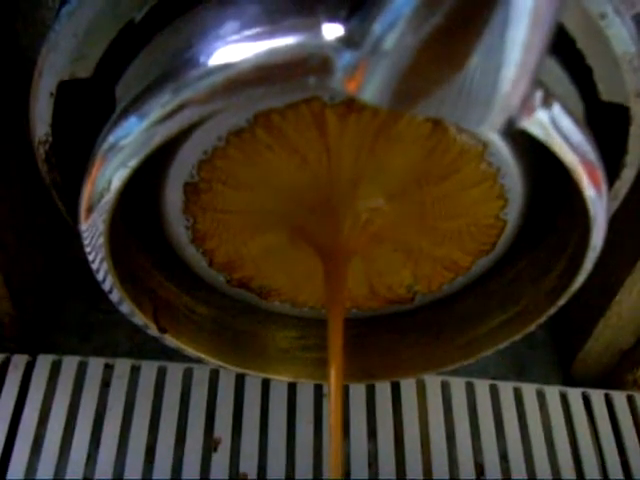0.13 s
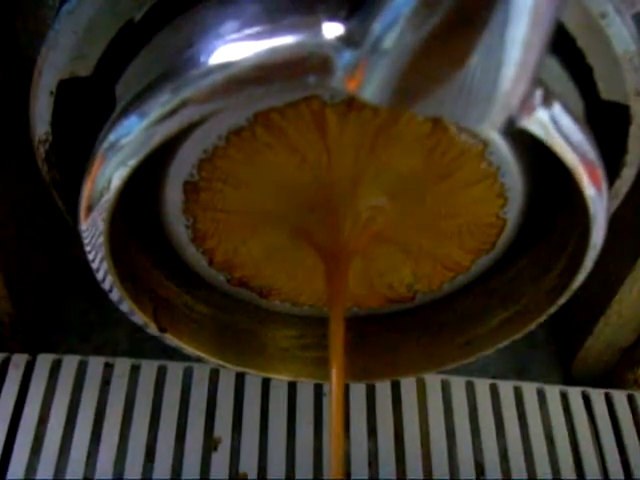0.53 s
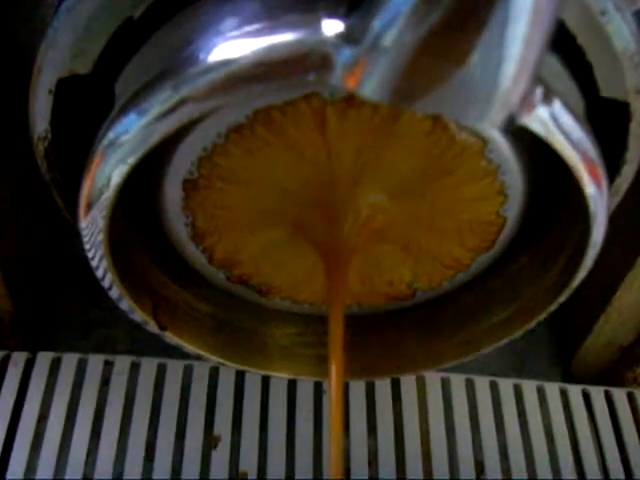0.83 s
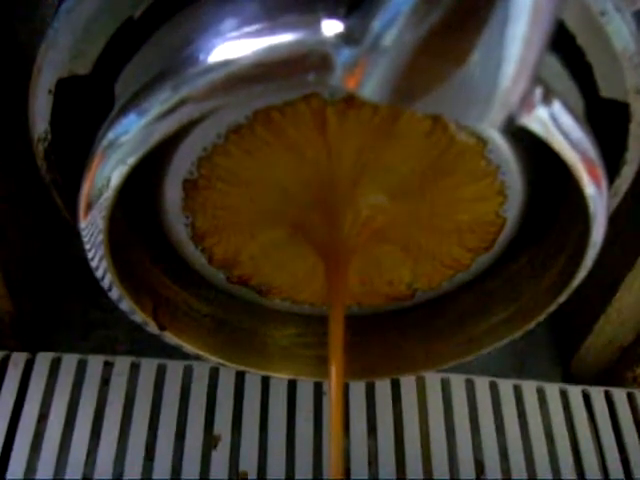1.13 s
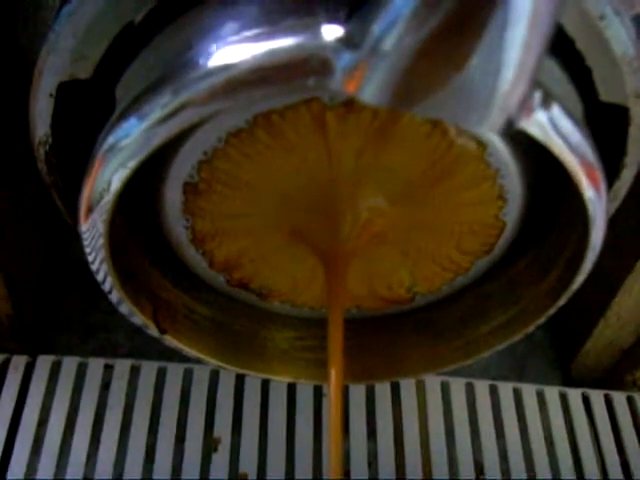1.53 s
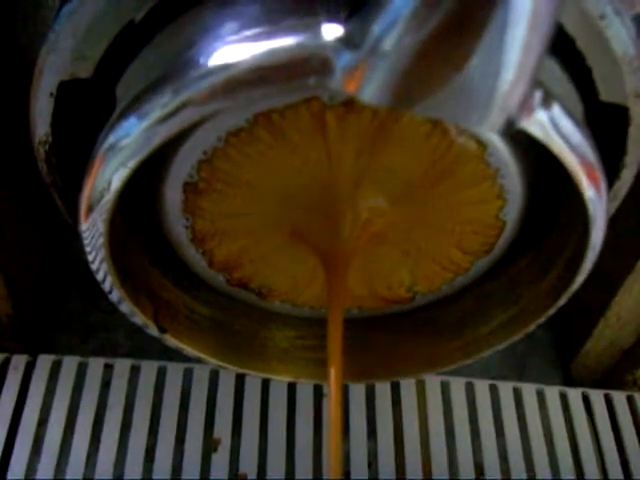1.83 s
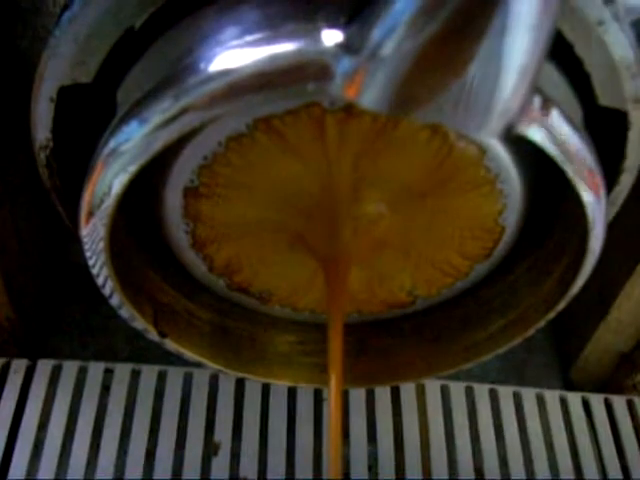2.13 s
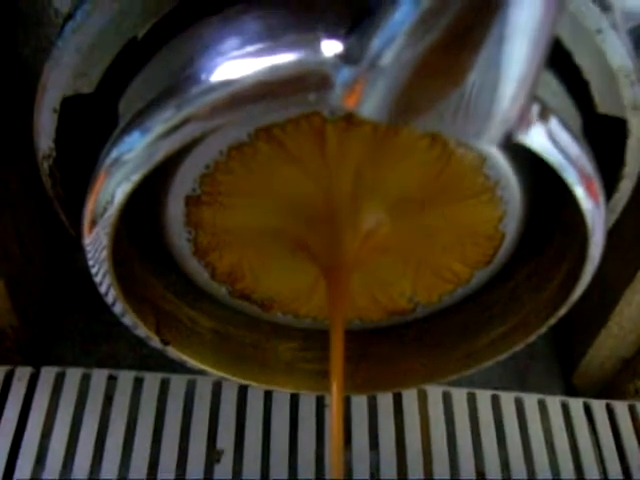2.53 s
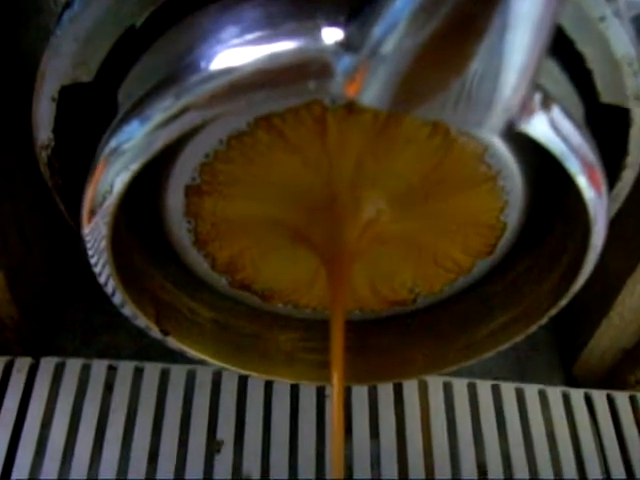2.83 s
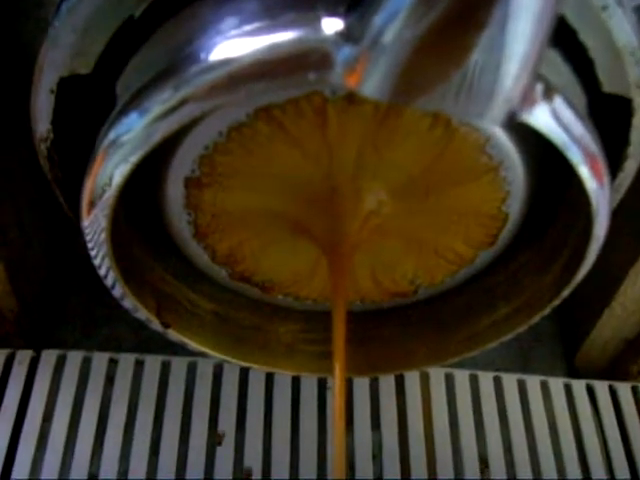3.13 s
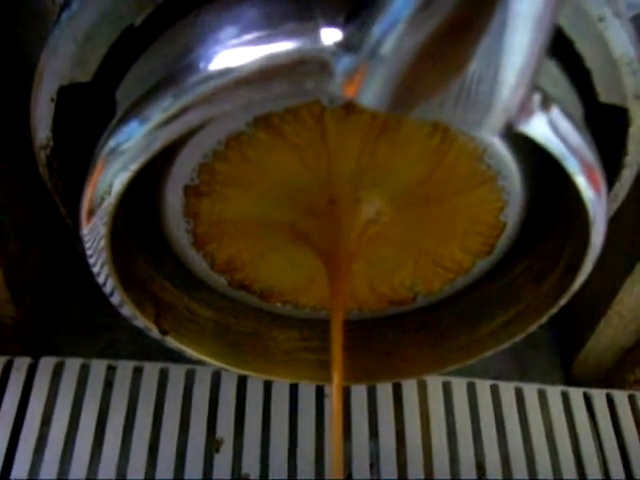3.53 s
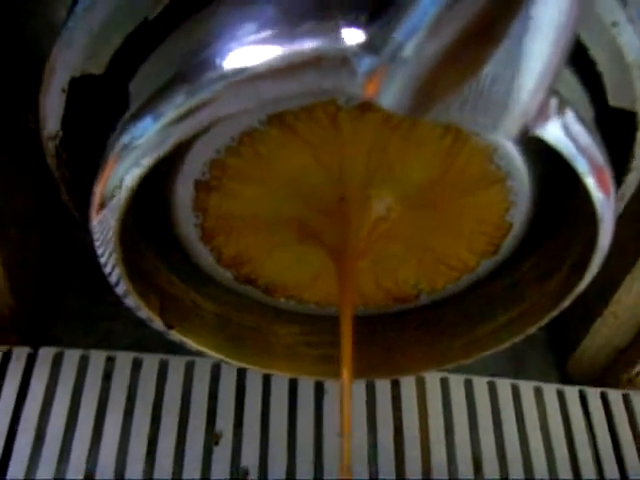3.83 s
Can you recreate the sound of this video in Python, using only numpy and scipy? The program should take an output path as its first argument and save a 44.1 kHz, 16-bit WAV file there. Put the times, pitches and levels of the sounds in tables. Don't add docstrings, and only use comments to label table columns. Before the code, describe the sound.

An espresso machine's harsh hammering buzz cuts off, followed by small clicks, bumps and a last hiss

```python
import sys
import numpy as np
from scipy import signal
from scipy.io import wavfile

SR = 44100
rng = np.random.default_rng(int(sys.argv[2]) if len(sys.argv) > 2 else 0)


def master(y):
    cut = np.clip(np.atleast_2d(y).T, -1, 1)
    pcm = np.round(cut * 32767)
    wavfile.write(sys.argv[1], SR, pcm.astype(np.int16))


def amplitude_ratio(level_db):
    exponent = np.asarray(level_db, float) / 20
    return 10 ** exponent


N = 176400
T = np.arange(N) / SR
STROKE_HZ, FIRST_S, STOP_S = 50.035, .0032, 1.7215
JITTER_S, SCATTER_DB = .0001, .8
THROB = .38
ROOM_T60 = 0.18


def evened(x):
    return x / np.sqrt(np.mean(x ** 2) + 1e-20)


def read(points, hz):
    f, value = np.transpose(points)
    return np.interp(np.log(hz + 1), np.log(f + 1), value)


def colour(x, points, peaks=()):
    hz = np.abs(np.fft.fftfreq(8192, 1 / SR))
    db = read(points, hz)
    db = db + sum(gain / (1 + (2 * (hz - f) / width) ** 2) for f, width, gain in peaks)
    minimum_phase = np.exp(np.conj(signal.hilbert(np.log(amplitude_ratio(db)))))
    taps = np.fft.ifft(minimum_phase).real[:4096]
    return signal.oaconvolve(x, taps)[:N]


def ring(modes, rise=0.0003):
    t = T[:3000]
    tones = sum(amplitude_ratio(db - 60 * t / t60) * np.sin(2 * np.pi * hz * t) for hz, db, t60 in modes)
    return np.minimum(t / rise, 1) * tones


def train(times, sizes):
    out = np.zeros(N)
    places = np.round(np.asarray(times) * SR).astype(int)
    np.add.at(out, np.clip(places, 0, N - 1), sizes)
    return out


def struck(times, sizes, modes, rise=0.0003):
    return signal.oaconvolve(train(times, sizes), ring(modes, rise))[:N]


def fuzzy(hz, width):
    r = np.exp(-np.pi * width / SR)
    noise = rng.standard_normal(N) + 1j * rng.standard_normal(N)
    slow = signal.lfilter([1], [1, -2 * r, r * r], noise)
    return evened((slow * np.exp(2j * np.pi * hz * T)).real)


def after(s, t60):
    return (T >= s) * amplitude_ratio(-60 * np.maximum(T - s, 0) / t60)


def throb():
    return np.cos(2 * np.pi * STROKE_HZ * (T - FIRST_S - .0078))


def rattle(at, luck):
    # (delay [s], level [dB], time to die by 60 dB [s])
    blows = [
        (0, 2.5, 0.023),
        (.0045, -3.5, 0.0052),
        (.0112, -12, 0.01),
    ]
    # (frequency [Hz], level [dB per Hz])
    case = [(150, -61), (1500, -35), (2100, -10.5), (3000, -13), (6000, -13.5), (8470, -11), (11000, -16.5),
            (12500, -21.5)]
    # (frequency [Hz], width [Hz], gain [dB])
    panels = [(2742, 72, 6), (3570, 220, 1), (6200, 590, 6), (7160, 1300, 1.5), (8290, 820, 8),
              (9380, 230, 5.5), ]
    t = T[:2000]
    gate = amplitude_ratio(-12.5) * (T < STOP_S)
    for k, (s, db, t60) in enumerate(blows):
        hits = train(at + s + JITTER_S * luck[:, k], amplitude_ratio(db + SCATTER_DB * luck[:, k + 3]))
        burst = amplitude_ratio(-60 * t / t60) * np.minimum(t / 0.00044, 1)
        gate = gate + signal.oaconvolve(hits, burst)[:N]
    return amplitude_ratio(-27) * evened(colour(gate * rng.standard_normal(N), case, panels))


def crack(at, luck):
    # (frequency [Hz], level [dB], time to die by 60 dB [s])
    crack_tones = [(8640, -0.5, 0.0079), (7100, -2, 0.01), (9650, -14, 0.0071)]
    out = np.zeros(N)
    for k, mode in enumerate(crack_tones):
        times = at + JITTER_S * (1 + luck[:, 0] + .5 * luck[:, 7 + k])
        out += struck(times, amplitude_ratio(SCATTER_DB * luck[:, 9 + k]), [mode])
    return_times = at + .011 + 4 * JITTER_S * luck[:, 2]
    out += struck(return_times, amplitude_ratio(2.0 * luck[:, 5]), [(8550, -10, .014)], rise=.001)
    return amplitude_ratio(-31) * evened(out)


def knock(at, luck):
    # (frequency [Hz], level [dB], time to die by 60 dB [s])
    knock_tones = [(3124, -3, 0.015), (3590, -1.5, 0.022), (3880, -18, 0.0027), (2730, -5.5, 0.034)]
    return amplitude_ratio(-41.5) * evened(struck(at, amplitude_ratio(luck[:, 6]), knock_tones))


def roar():
    # (frequency [Hz], level [dB per Hz])
    body = [(60, -31), (170, -20.5), (300, -12.5), (800, -3), (1500, -4.5), (2200, -8), (3000, -24.5),
            (12000, -88)]
    # (frequency [Hz], width [Hz], gain [dB])
    body_peaks = [(750, 200, 1.8), (1320, 350, 1.8), (1855, 70, 6), (400, 300, 2)]
    shaking = (T < STOP_S) * (1 + THROB * throb())
    return amplitude_ratio(-30) * evened(colour(shaking * rng.standard_normal(N), body, body_peaks))


def whistle():
    flow = (T < STOP_S) * (1 + .3 * throb()) + after(STOP_S, ROOM_T60)
    return amplitude_ratio(-38) * evened(fuzzy(5110, 380) * flow)


def lever():
    # (time [s], level [dB], time to die by 60 dB [s])
    switch = [
        (1.631, -15, 0.018),
        (1.706, -11, 0.04),
    ]
    bursts = sum(amplitude_ratio(db) * after(s, t60) for s, db, t60 in switch)
    return colour(bursts * rng.standard_normal(N), [(1500, -28), (4000, 3.5)])


def clatter(at):
    luck = rng.standard_normal((len(at), 12))
    return rattle(at, luck) + crack(at, luck) + knock(at, luck) + roar() + whistle() + lever()


def hum(at, slip):
    # (multiple of the stroke rate, level [dB])
    tones = [(1, -40), (2, -12), (3, -27), (4, -12.5), (5, -10), (6, -9.5), (7, -8), (8, -7), (9, -8.5),
             (10, -4.5), (11, -8), (12, -16.5), (13, -20), (14, -7), (15, -9.5), (16, -3), (17, -3.5),
             (18, -5.5), (19, -14), (20, -13), (21, -7), (22, -21), (23, -16), (24, -11), (25, -6.5),
             (26, -7.5), (27, -11), (28, -9.5), (29, -11.5), (30, -22), (31, -8), (32, -10.5), (33, -27),
             (34, -25), (35, -28), (36, -11.5), (37, 4.5), (38, -14.5), (39, -18), (40, -17), (41, -18)]
    # (frequency [Hz], lag [s])
    lag = [(150, .0059), (200, -.0018), (300, .0022), (500, .0065), (550, .0125), (600, .0026),
           (1150, .003), (1200, .009), (1350, .015), (1450, .0105), (1850, .009)]
    # (frequency [Hz], phase wander [rad])
    loose = [(100, .05), (500, .12), (900, .2), (1400, .3), (1750, .5), (1850, .3), (2200, .8)]
    # (frequency [Hz], time to die by 60 dB [s])
    ring_out = [(100, 0.57), (180, 0.15), (360, .17), (700, 0.21), (1400, 0.13), (1850, 0.13), (2300, .2)]
    order, db = np.transpose(tones)
    back = 0.63 * np.clip(order / 12, 0, 1)
    phase = np.angle(1 + back * np.exp(-2j * np.pi * STROKE_HZ * order * .0088))
    phase -= 2 * np.pi * STROKE_HZ * np.cumsum(read(lag, order * STROKE_HZ))
    steps, t = np.arange(0, 2.3, .005), T[:round(2.2 * SR)]
    late = np.interp(t, at + .006, slip)
    stopped = np.maximum(t - STOP_S, 0)
    smooth = np.exp(-2 * np.pi * 7 * .005)
    out = np.zeros(N)
    for k, g, p in zip(order, db, phase):
        hz, loudest = k * STROKE_HZ, g == db.max()
        pair = signal.filtfilt([1], [1, -smooth], rng.standard_normal((2, len(steps))))
        swell, wander = (read(loose, hz) * np.interp(t, steps, evened(v)) for v in pair)
        free = 2 * np.pi * STROKE_HZ * rng.uniform(-0.54, 0.46) * stopped * (k > 3)
        dying = np.maximum(t - STOP_S + .024 * loudest, 0)
        size = (1 + .2 * np.tanh(swell)) * amplitude_ratio(g - 60 * dying / read(ring_out, hz))
        size *= 1 + THROB * loudest * throb()[:len(t)]
        shifted = t - FIRST_S - late * (1 - .4 * loudest)
        out[:len(t)] += size * np.cos(2 * np.pi * hz * shifted + p + wander + free)
    return amplitude_ratio(-26) * out


def ticks():
    # (time [s], level [dB], brightness [dB])
    tick_events = [(1.8078, -23.5, -5.5), (1.8305, -26, -10), (1.854, -36, 0.0), (1.8644, -38, 4),
                   (1.8707, -28, -4), (1.886, -28.5, -1.5), (1.924, -28, -2), (1.933, -27, 1),
                   (1.9445, -30, -5), (1.9826, -33, -17), (2.0685, -37, 4), (2.0765, -33, -4),
                   (2.088, -39, 3), (2.0958, -30, -3), (2.104, -31, -3), (2.1277, -24, -9),
                   (2.1354, -31, -6), (2.1415, -35, -5), (2.146, -37, -5), (2.153, -34, -6),
                   (2.1663, -38, 4), (2.1858, -34, 0.0), (2.206, -26, -11), (2.2149, -29.5, 0),
                   (2.2365, -41, 3), (2.2695, -33, -8), (2.318, -36, -8), (2.2578, -27.5, 1.5),
                   (2.264, -29, -7), (2.2996, -30, -1), (2.3213, -30, -10), (2.379, -38, 0.0),
                   (2.401, -29, -1.5), (2.4553, -34, -5),
                   (2.4877, -31, -5), (2.5087, -30, 1), (2.562, -35.5, 4.5), (2.571, -41, 2),
                  (2.5925, -41, 5), (2.6202, -24, 4), (2.643, -41, 6), (2.648, -42, 6),
                  (2.6662, -29.5, -2.5), (2.7137, -34, 3), (2.7555, -36, -4), (2.722, -39, -6),
                  (2.739, -38, -8), (2.7728, -31.5, 0.5), (2.816, -39, -1), (2.834, -38, 5.5),
                  (2.842, -42, 6), (2.854, -38, -6), (2.9676, -31, -6), (3.057, -38, -2), (3.094, -33, -5),
                  (3.1275, -37.5, -5), (3.253, -37, -1), (3.3865, -42, 1), (3.467, -31, 0.0),
                  (3.457, -40, -2), (3.571, -41, 2), (3.6358, -35, -0.5), (3.6595, -34.5, 4)]
    # (frequency [Hz], level [dB], time to die by 60 dB [s])
    low_tones = [(1950, -5, .013), (2200, -4, .012), (2480, -3, .014), (2720, -6, .012)]
    # (frequency [Hz], level [dB], time to die by 60 dB [s])
    high_tones = [(4540, -3, 0.007), (5750, -10, 0.006), (7100, 1, 0.008), (8450, 3, 0.008),
                  (9350, -3, 0.007)]
    out = np.zeros(N + 3000)
    for s, db, bright_db in tick_events:
        modes = np.array(low_tones + [(f, g + bright_db, d) for f, g, d in high_tones])
        modes[:, 0] *= rng.uniform(.98, 1.02, 9)
        modes[:, 1] += 1.5 * rng.standard_normal(9)
        tick = ring(modes[:4], rise=0.00065) + ring(modes[4:], rise=.0004)
        out[round(s * SR):][:3000] += amplitude_ratio(db - 4.5) * tick
    busy = (T > STOP_S) * np.exp(-(T - STOP_S) / .8)
    faint = (rng.random(N) < 60 * busy / SR) * rng.random(N)
    return out[:N] + amplitude_ratio(-46) * signal.oaconvolve(faint, ring(low_tones + high_tones))[:N]


def bumps():
    # (time [s], level [dB], frequency [Hz], time to die by 60 dB [s])
    thuds = [(1.879, -35, 900, 0.05), (1.879, -41, 5700, .03), (1.897, -41, 650, 0.05),
             (2.057, -36, 1000, 0.05), (3.303, -44, 5300, .03), (3.341, -42, 3000, .012),
             (2.238, -40, 1100, 0.051), (2.0565, -30, 5700, 0.035), (2.057, -31, 4300, .035),
             (2.056, -37, 7800, .025), (2.236, -47, 6000, .12), (1.8695, -37.5, 4500, .02),
             (2.3, -42, 5300, .04), (3.341, -29.5, 10290, 0.012), (3.384, -35, 5800, 0.014)]
    return sum(amplitude_ratio(db) * after(s, t60) * fuzzy(hz, .35 * hz) for s, db, hz, t60 in thuds)


def pings():
    # (time [s], level [dB], frequency [Hz], time to die by 60 dB [s])
    tones = [
        (1.742, -49.5, 3220, .3),
        (1.704, -31, 3960, 0.055),
        (1.71, -46, 5900, .25),
        (1.72, -31, 720, .2),
    ]
    return sum(amplitude_ratio(db) * after(s, t60) * np.sqrt(2) * np.sin(2 * np.pi * hz * T) for s, db, hz, t60 in tones)


def whine():
    kick_s, hz = 2.832, 8122
    size = (T > kick_s) + 0.27 * (T > STOP_S) + amplitude_ratio(24) * after(kick_s, 0.03)
    return amplitude_ratio(-67) * size * (np.sqrt(2) * np.sin(2 * np.pi * hz * T) + 0.19 * fuzzy(hz, 12))


def squeak():
    # (time [s], frequency [Hz], level [dB])
    path = [
        (3.49, 9000, -80),
        (3.51, 8900, -60),
        (3.565, 8850, -62),
        (3.58, 8800, -51),
        (3.61, 8900, -59),
        (3.66, 8850, -80),
    ]
    s, hz, db = np.transpose(path)
    size = amplitude_ratio(np.interp(T, s, db, -120, -120)) * (1 + .5 * fuzzy(40, 60))
    return size * np.sin(2 * np.pi * np.cumsum(np.interp(T, s, hz)) / SR)


def vent():
    # (time [s], level [dB])
    puff = [
        (3.72, -75),
        (3.77, -52.5),
        (3.85, -53.5),
        (3.89, -60),
        (3.95, -47),
        (4.0, -47),
    ]
    # (frequency [Hz], level [dB])
    hiss = [(300, -9), (1500, -7), (4500, 1.5), (7000, 2), (11000, -10.5)]
    s, db = np.transpose(puff)
    flutter_db = 2.0 * fuzzy(25, 30)
    return evened(colour(rng.standard_normal(N), hiss)) * amplitude_ratio(np.interp(T, s, db, -120) + flutter_db)


def kitchen():
    # (frequency [Hz], level [dB per Hz])
    air = [(15, -9.5), (53, -4), (170, -15.5), (500, -6.5), (1400, -14.5), (3200, -26), (10000, -23),
           (12200, -35)]
    # (frequency [Hz], width [Hz], gain [dB])
    air_peaks = [(228.3, 31, 13.5), (48.3, 10, 6), (480, 19, 4.5), (578, 16, 4), (625, 43, -6),
                 (790, 20, 5.5), (944, 41, 3), (1400, 45, 5.5), (2520, 840, 7), (7100, 350, -2.5),
                 (8550, 1200, 1.5)]
    floor = evened(colour(rng.standard_normal(N), air, air_peaks))
    settle_db = 2.5 * np.exp(-np.maximum(T - STOP_S, 0) / 0.35)
    return amplitude_ratio(-47 + settle_db) * floor


def room(x):
    t = T[:SR // 2]
    tail = rng.standard_normal(len(t)) * amplitude_ratio(-60 * t / ROOM_T60) * (t > .003)
    tail = signal.lfilter([1], [1, -.3], tail)
    return signal.fftconvolve(x, tail / np.linalg.norm(tail))[:N]


def scene():
    at = np.arange(FIRST_S, STOP_S - .005, 1 / STROKE_HZ)
    slip = .00011 * rng.standard_normal(len(at))
    pump = clatter(at + slip)
    small = ticks() + bumps() + pings() + whine() + squeak()
    echo = room(amplitude_ratio(-11.5) * pump + amplitude_ratio(-12.5) * small)
    return (hum(at, slip) + pump + small + echo + vent() + kitchen())[None]


def roll_off(x):
    return signal.sosfilt(signal.butter(12, 12810, fs=SR, output="sos"), x)


def record(dry):
    # (frequency [Hz], level [dB])
    treble_edge = [(11000, -1.5), (12200, -19), (12800, -37), (13600, -55)]
    mix = colour(dry[0], treble_edge)[None]
    return roll_off(mix)


dry = scene()
out = record(dry)
master(out)
```